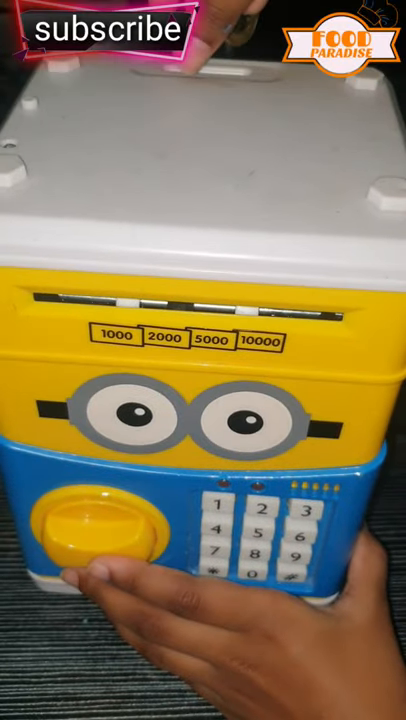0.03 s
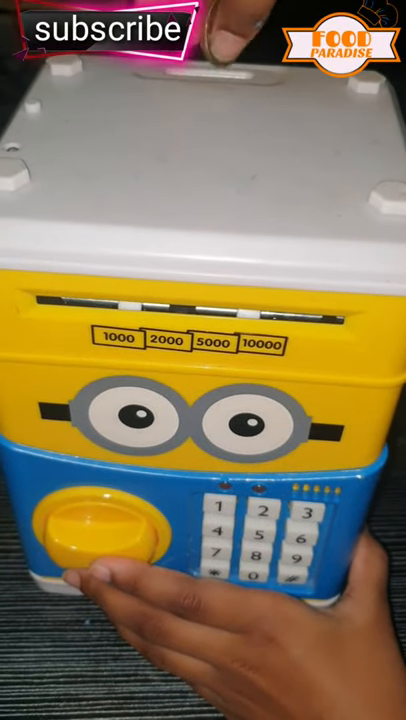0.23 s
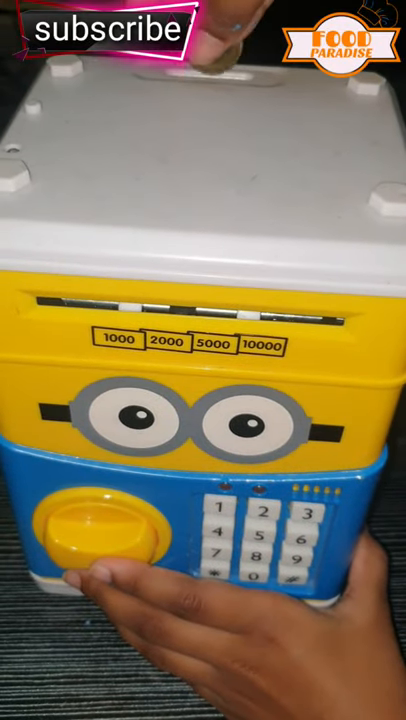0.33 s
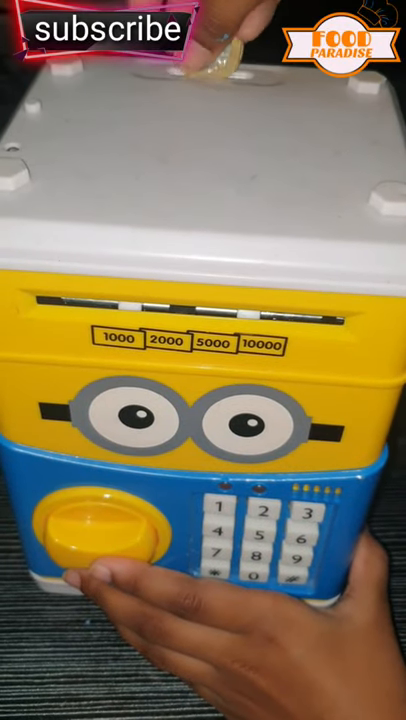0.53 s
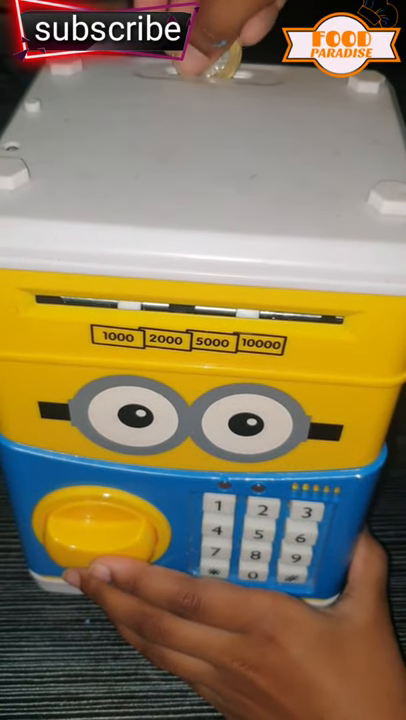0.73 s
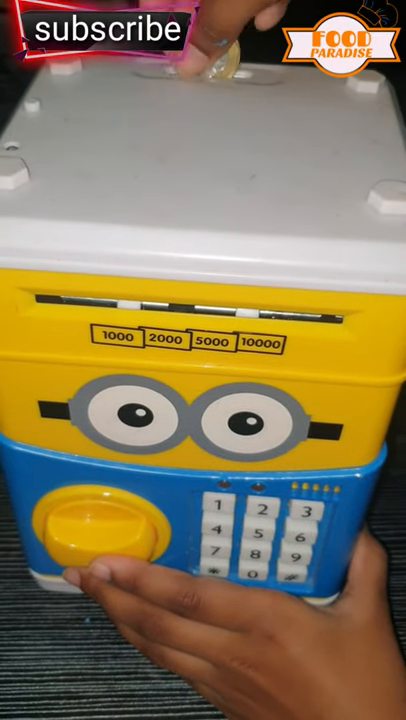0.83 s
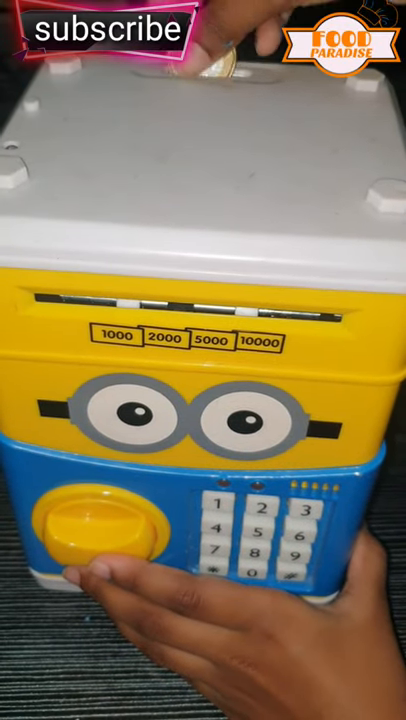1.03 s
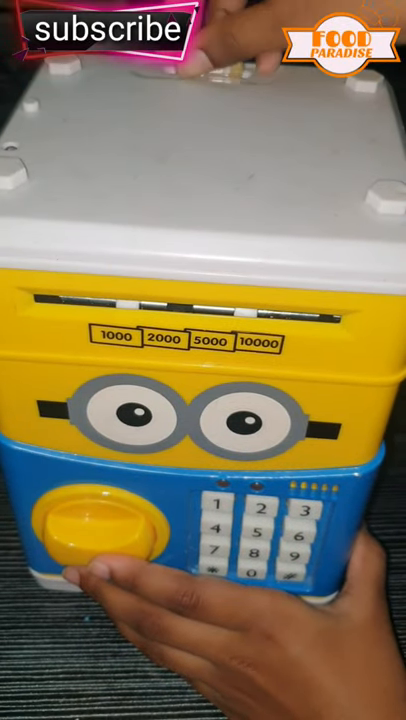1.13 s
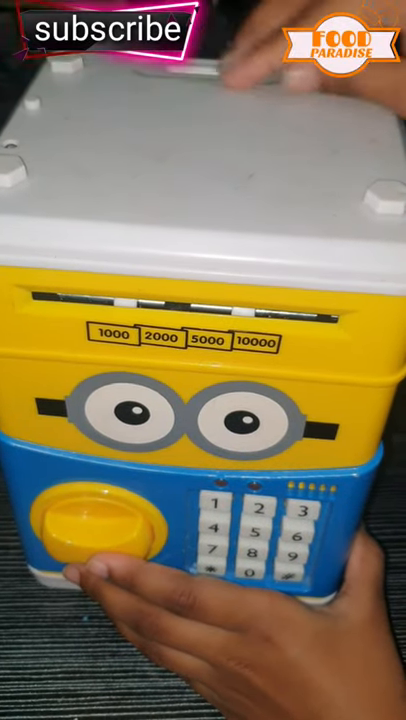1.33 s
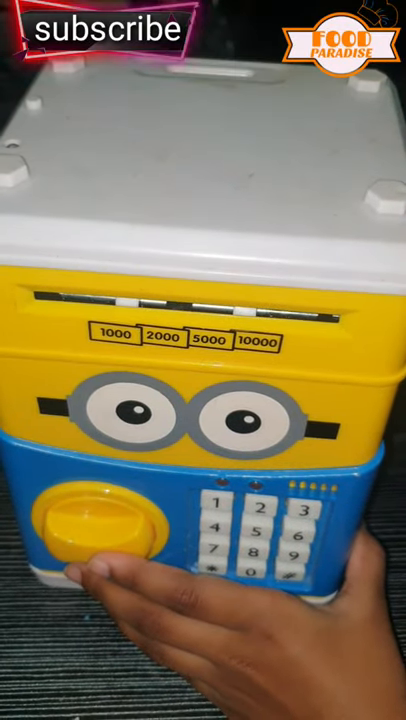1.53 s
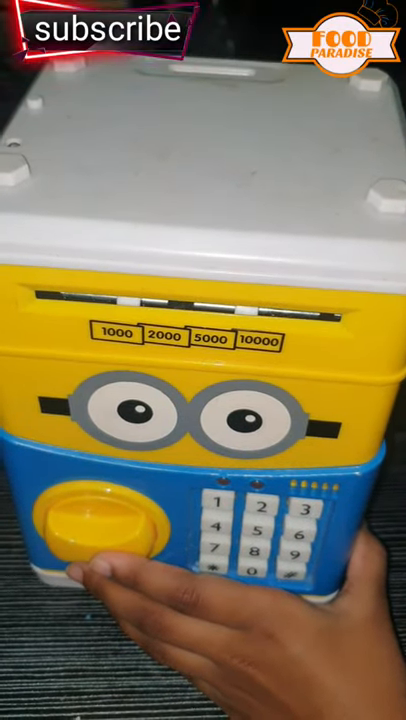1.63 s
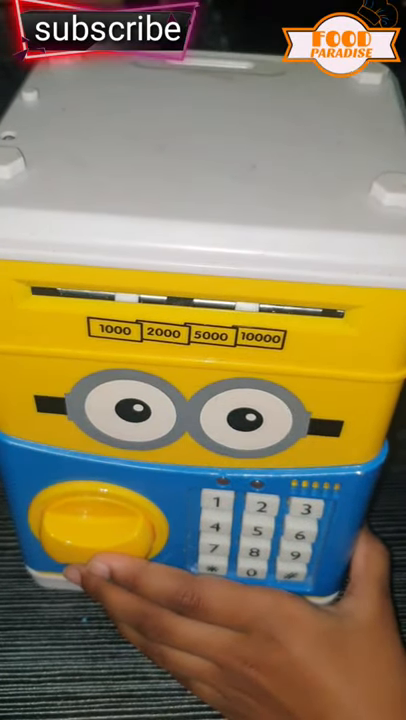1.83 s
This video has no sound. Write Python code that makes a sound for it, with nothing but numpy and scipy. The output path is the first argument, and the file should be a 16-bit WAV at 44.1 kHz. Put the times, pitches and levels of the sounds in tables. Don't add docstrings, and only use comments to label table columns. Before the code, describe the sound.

Coins drop into a hollow plastic money box. A knock at the slot at 0.1 seconds and a faint scrape lead to a loud crack at 0.23, then uneven bounces and weakening rattles until 0.85. Quiet finger ticks come around 1.15 to 1.35. A second coin cracks down at 1.44, clattering quickly until 1.7. Very close, overloaded stereo sound, short room reverberation, soft hush and low hand rumble.

```python
import sys
import numpy as np
from scipy import signal
from scipy.fft import rfft, irfft, next_fast_len
from scipy.io import wavfile
from scipy.ndimage import uniform_filter1d, minimum_filter1d

SR = 44100
rng = np.random.default_rng(int(sys.argv[2]) if len(sys.argv) > 2 else 0)


def log_audio(samples):
    frames = np.atleast_2d(samples).T
    limited = np.clip(frames, -1, 1)
    pcm = np.round(limited * 32767).astype(np.int16)
    wavfile.write(sys.argv[1], SR, pcm)


def boost(x):
    u = np.asarray(x, float) / 20
    return 10 ** u


N = 83790
NOW = np.arange(N) / SR
SIZE = next_fast_len(N + SR)
HZ = np.maximum(np.arange(SIZE // 2 + 1) * SR / SIZE, 1)
BURST_T = np.arange(1400) / SR


def at_hz(points, hz=HZ):
    table = np.array(points)
    return np.interp(np.log(hz), np.log(table[:, 0]), table[:, 1])


def shape(x, response):
    return irfft(rfft(x, SIZE) * response, SIZE)[..., :N]


def causal(db):
    fold = irfft(np.log(boost(db)), SIZE)
    fold[1:SIZE // 2] *= 2
    fold[SIZE // 2 + 1:] = 0
    return np.exp(rfft(fold))


def rms_one(x):
    return x / np.sqrt(np.mean(x ** 2) + 1e-20)


# (frequency [Hz], left-right likeness [0-1])
PORT_LIKENESS = [(30, 0.25), (80, 1), (300, 0.88), (700, 0.13), (2000, .1), (12000, 0.071)]


def pair(length):
    mid, side = rng.standard_normal((2, length))
    alike = at_hz(PORT_LIKENESS)
    common = shape(mid, np.sqrt(1 + alike))
    opposed = shape(side, np.sqrt(1 - alike)) * [[1], [-1]]
    return (common + opposed)[:, :length]


# (frequency [Hz], level [dB])
HUSH_SPECTRUM = [(15, -55), (25, -39.5), (72, -19.5), (145, -7), (249, -19), (277, -16), (863, -27.5),
                 (1020, -26), (16000, -64)]
# (time [s], rumble level [dB], hush level [dB])
HAND_COURSE = [(0.0, -58, 7), (0.104, -39.5, 9.5), (0.28, -49.5, -2.5), (1.016, -56, 0), (1.136, -41, -3.5),
               (1.39, -61, 1.5), (1.428, -46.5, -1), (1.804, -57, -0.5), (1.9, -45.5, 3)]


def background():
    hush = boost(-47.5) * rms_one(shape(pair(N), boost(at_hz(HUSH_SPECTRUM))))
    rumble_hz, width_hz = 68, 22
    rumble = rms_one(shape(pair(N), 1 / (1 + ((HZ - rumble_hz) / width_hz) ** 2)))
    s, rumble_db, hush_db = np.transpose(HAND_COURSE)
    return hush * boost(np.interp(NOW, s, hush_db)) + rumble * boost(np.interp(NOW, s, rumble_db))


# (time [s], peak level [dB], box air re peak [dB], top re peak [dB], length [ms])
FINGER_TICKS = [
    (0.066, -40, 1.5, -38, 5.3),
    (.098, -16.5, -9, -22.5, 2.84),
    (1.155, -43, -6.5, -44, 5),
    (1.173, -44, -11, -39, 5),
    (1.254, -36.5, -11, -23, 3.2),
    (1.263, -30, -4, -19.5, 4),
    (1.272, -28.5, -14, -28, 3.5),
    (1.289, -36, 0, -38, 1.3),
    (1.353, -42, 4.5, -14.5, 9),
    (1.856, -43.5, -27, -6, 3.5),
]
FIRST_COIN = [(0.23, 8.5, -18, -14.5, 2.35), (0.283, -5.5, -17, -13, 2.24), (0.412, -17, -16.5, -14, 2.3),
              (0.429, 3, -24.5, -18.5, 3.53), (0.445, -24, 0.5, -18, 0.88), (0.528, -7, -15, -6.5, 2.94),
              (0.549, -8.5, -21, -6.5, 5.3), (0.567, -11, -24.5, -0.5, 1.1), (0.581, -14, -16.5, -40, 7.5),
              (0.622, -15.5, -15.5, -11, 7.5), (0.657, -20, -20, -9, 3)]
RIM_ROCKING = [
    (0.7, -13, -27, -10.5, 2.84),
    (0.728, -22, -23, -16, 5),
    (0.76, -25, -24, -11, 6.5),
    (.787, -20.5, -26.5, -12.5, 3.5),
    (0.813, -19, -26.5, -14, 2.4),
    (0.828, -25.5, -22, -13, 5),
    (.843, -24, -28, -11, 1.8),
]
SECOND_COIN = [(1.438, 5, -9.5, -12.5, 3.16), (1.458, -7.5, -15, -11, 3.1), (1.486, -13.5, -14, -13, 4),
               (1.507, -5.5, -14.5, -13.5, 3), (1.529, -18, -14.5, -9, 2.7), (1.566, -10, -22, -10.5, 2.5),
               (1.578, -8.5, -18.5, -7.5, 2), (1.584, -4, -22.5, -5.5, 2.2), (1.625, -13.5, -18, -4.5, 2.2),
               (1.663, -18.5, -22, -15, 2.6), (1.693, -33, -17.5, -11, 3.2)]


def contacts():
    return np.transpose(FINGER_TICKS + FIRST_COIN + RIM_ROCKING + SECOND_COIN)


def stick_slip(db, ms):
    length = ms[:, None] / 1000
    soft = np.clip((-5 - db) / 8, 0, 1)[:, None]
    rise = 0.0002 + soft * 0.7 * length
    fade = np.exp(-BURST_T / length) * (1 - np.exp(-BURST_T / rise))
    noise, draw = rng.standard_normal((2, len(db), len(BURST_T)))
    slips_per_s = 2500
    slips = noise * (np.abs(draw) < 1.25 * slips_per_s / SR)
    slips[:, 8] = 1
    slips = slips * fade
    return noise, fade, slips / np.sqrt(np.sum(slips ** 2, axis=1))[:, None]


def lay(times, bursts):
    out = np.zeros(N + bursts.shape[1])
    for s, burst in zip(times, bursts):
        start = int(s * SR)
        out[start:start + len(burst)] += burst
    return out[:N]


# (frequency [Hz], level [dB per Hz])
CRACK_SPECTRUM = [(400, -36), (650, -4), (1050, 1.5), (2200, 0), (6500, -11), (9000, -21.5), (11500, -13.5),
                  (15500, -25.5)]


def surface_radiation(x):
    return shape(x, causal(at_hz(CRACK_SPECTRUM)))


TOP_MEAN_DB = -15.5


def cracks(s, db, top_db, ms, noise, fade):
    alike, other = 0.1, rng.standard_normal(noise.shape)
    common, opposed = np.sqrt(1 + alike) * noise, np.sqrt(1 - alike) * other
    click = (BURST_T == 0) * boost(18.5) * np.sqrt(ms / 3)[:, None]
    low, high = [signal.butter(2, 2900, kind, fs=SR, output="sos") for kind in ("low", "high")]
    out = []
    for puff in [(common + opposed) * fade, (common - opposed) * fade, click]:
        treble = signal.sosfilt(high, puff) * boost(top_db - TOP_MEAN_DB)[:, None]
        puff = signal.sosfilt(low, puff) - treble
        out.append(lay(s, puff * boost(db + 2.5)[:, None]))
    return surface_radiation(np.array(out))


def ring(force, hz, t60):
    r, w = boost(-60 / (t60 * SR)), 2 * np.pi * hz / SR
    return signal.lfilter([0, np.sin(w)], [1, -2 * r * np.cos(w), r * r], force + 1e-18)


def body(modes, times, bursts, db):
    db = db + 4 * rng.normal(0, 1, (len(times), len(modes)))
    out = 0
    for k, (hz, level_db, t60) in enumerate(modes):
        force = lay(times, bursts * boost(db[:, [k]] + level_db))
        out = out + ring(force, hz, t60)
    return out


SLIDE_START_S, SLIDE_END_S = 0.105, 0.18
# (frequency [Hz], level [dB], t60 [s])
WALL_MODES = [(690, -18, 0.025), (918, -10.5, 0.095), (1134, 8.5, 0.14), (1134, -7.5, 0.07),
              (1580, -16, 0.12), (1562, 6.5, 0.094), (1640, 3.5, 0.028), (1940, -5, 0.029),
              (2254, -3, 0.07), (2278, 0, 0.034), (2550, -17, 0.031), (2917.6, -3.5, 0.012),
              (3392, 10.5, 0.021), (4072, 5.5, .025)]


def walls(s, db, top_db, slips):
    modes = [(hz, level_db, min(t60, 0.03)) for hz, level_db, t60 in WALL_MODES]
    hz = np.array(WALL_MODES)[:, 0]
    brightness = np.clip(top_db - TOP_MEAN_DB, -9, 9)
    tilt_db = 0.34 * np.outer(brightness, np.log2(hz / 1800))
    slot_hz, slot_octaves = 2500, 0.6
    near_slot = np.exp(-(np.log2(hz / slot_hz) / slot_octaves) ** 2)
    slot_db = np.outer(s < SLIDE_START_S, 9 * (2 * near_slot - 1))
    return body(modes, s, slips, db[:, None] - 16.5 + tilt_db + slot_db)


# (frequency [Hz], level [dB])
COIN_MODES = [(3500, 4.5), (4530, 5.5), (5640, 7), (7070, -4), (11300, 0)]


def coin(s, db, top_db, slips):
    modes = [(hz, level_db, 0.012) for hz, level_db in COIN_MODES]
    return body(modes, s, slips, (db + top_db)[:, None] - 35)


# (frequency [Hz], level [dB], t60 [s])
AIR_MODES = [(272, -5, .1), (344, 0, .09), (385, -5, .06), (468, -5, .07), (310, -5, .025)]
# (level [dB]), one per air mode
LID_AIR_DB = [9, -5, -8, -4, -4]


def air(s, db, air_db):
    push_hz, lag_s = 356, 0.0033
    push = BURST_T * np.exp(-2 * np.pi * push_hz * BURST_T)
    pushes = np.tile(push / push.sum(), (len(s), 1))
    on_lid = (s > 1) & (s < SECOND_COIN[0][0] - 0.02)
    level_db = (db + air_db + 8.5)[:, None] + np.outer(on_lid, LID_AIR_DB)
    return body(AIR_MODES, s + lag_s, pushes, level_db)


# (frequency [Hz], t60 [s])
ROOM_DECAY = [(200, 0.48), (600, 0.39), (1500, 0.37), (4000, 0.4), (10000, .34)]
# (frequency [Hz], level [dB])
ROOM_LEVEL = [(200, 0), (600, 6.5), (1500, 3.5), (4000, 0.5), (10000, 7), (16000, 5)]


def room(x):
    t = np.arange(SR // 2) / SR
    edges = 150 * 2 ** np.arange(0, 7.1)
    white = pair(len(t)), pair(len(t))
    echo = 0
    for k, (low, high) in enumerate(zip(edges, edges[1:])):
        hz = np.sqrt(low * high)
        band = signal.sosfilt(signal.butter(2, [low, high], "band", fs=SR, output="sos"), white[k % 2])
        echo = echo + band * boost(at_hz(ROOM_LEVEL, hz) - 60 * t / at_hz(ROOM_DECAY, hz))
    echo = echo * (1 - np.exp(-t / 0.0025))
    echo = echo / np.sqrt(np.sum(echo ** 2) / 2)
    return boost(-2.5) * shape(x, rfft(echo, SIZE))


def slide():
    rise_s = 0.02
    swell = np.clip(np.minimum(NOW - SLIDE_START_S, SLIDE_END_S - NOW) / rise_s, 0, 1)
    return surface_radiation(boost(-52) * swell * rng.standard_normal((3, N)))


def money_box():
    s, db, air_db, top_db, ms = contacts()
    noise, fade, slips = stick_slip(db, ms)
    solid = walls(s, db, top_db, slips) + coin(s, db, top_db, slips)
    box = cracks(s, db, top_db, ms, noise, fade) + slide()
    box = box + (solid + air(s, db, air_db)) * boost([[0], [0], [-7]])
    return signal.sosfilt(signal.butter(4, 289, "high", fs=SR, output="sos"), box)


# (frequency [Hz], level [dB])
PORT_TILT = [(200, 3), (350, -3), (700, 2), (1400, -6), (2800, -8), (5600, 0), (12000, .5)]


def scene():
    left, right, spread = money_box()
    lag_s = 0.00012
    half = boost(at_hz(PORT_TILT) / 2) * np.exp(1j * np.pi * HZ * lag_s)
    direct = np.array([shape(left, half), shape(right, 1 / half)])
    return direct + room(spread) + background()


def band_limit(x):
    return signal.sosfilt(signal.butter(12, 16200, fs=SR, output="sos"), x)


def record(dry):
    cut = signal.sosfilt(signal.cheby2(10, 50, 15900, fs=SR, output="sos"), dry)
    limit, span = 1.7, int(0.0015 * SR)
    gain = np.minimum(1, limit / (np.abs(cut).max(0) + 1e-9))
    gain = uniform_filter1d(minimum_filter1d(gain, size=span), size=span)
    return band_limit(np.clip(cut * gain, -1, 1))


dry = scene()
out = record(dry)
log_audio(out)
```